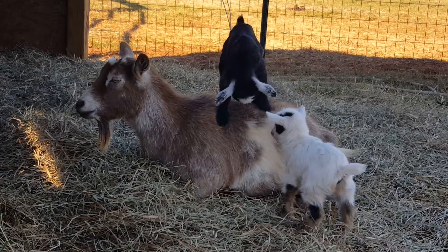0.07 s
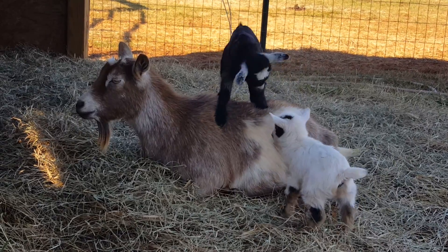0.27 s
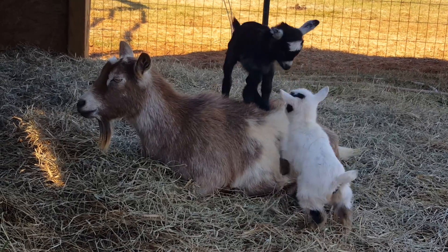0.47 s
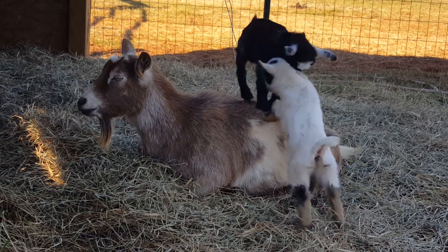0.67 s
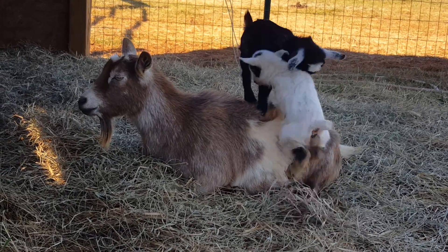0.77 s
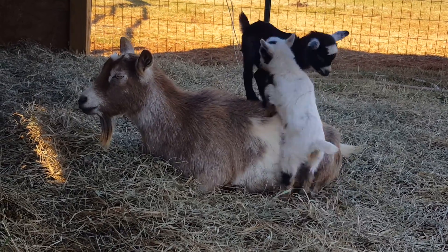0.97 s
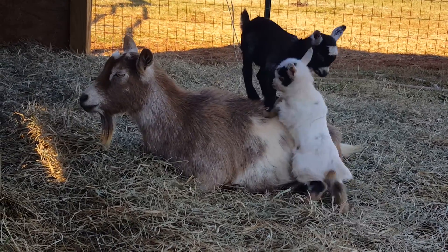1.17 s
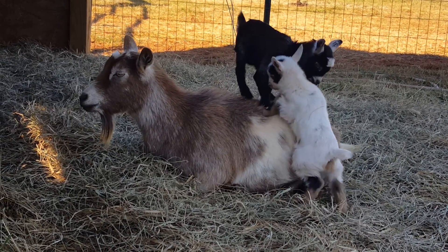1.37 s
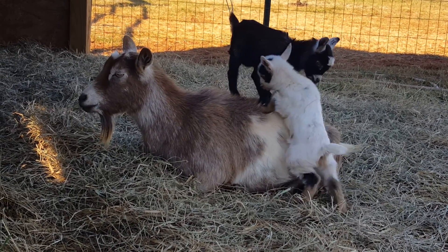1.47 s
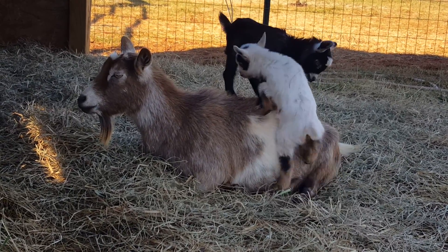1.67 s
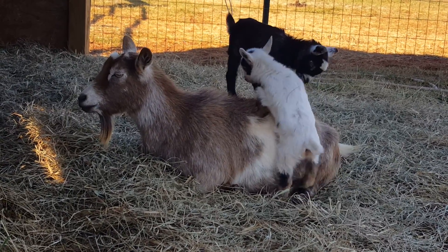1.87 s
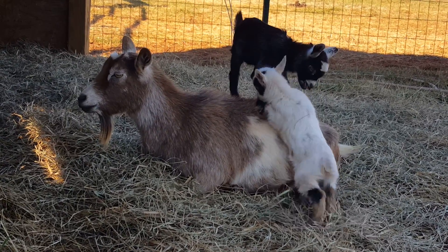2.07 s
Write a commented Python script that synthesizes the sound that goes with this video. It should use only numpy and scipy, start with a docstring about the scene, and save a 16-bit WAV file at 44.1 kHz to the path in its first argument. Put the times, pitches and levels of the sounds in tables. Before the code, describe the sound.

Wind rumble and thumping on a microphone, almost covering goat kids' light steps in dry hay

```python
"""Breeze on a camera, goats in hay

A gusty breeze buffets the two ports of a hand-held camera, the left one hardest: band-split noise whose level
and brightness follow separate tables, with soft thumps (left port) and sharp snaps. A few hard broadband ticks
sound at the left port. Far under it young goats step in dry hay: faint treble rustles and breaking stalks from
enveloped noise. Microphone hiss lies under everything; a limiter holds the loudest gusts."""
import sys
import numpy as np
from scipy.fft import rfft, irfft, next_fast_len
from scipy.io import wavfile
from scipy.ndimage import uniform_filter1d, minimum_filter1d, map_coordinates

SR = 44100
rng = np.random.default_rng(int(sys.argv[2]) if len(sys.argv) > 2 else 0)


def dump_mix(stems):
    """Bounce the given channels to the path in sys.argv[1] as a 16-bit WAV at rate SR."""
    frames = np.atleast_2d(stems).T  # one column per channel
    limited = np.clip(frames, -1, 1)  # hard clip at full scale
    pcm = np.round(limited * 32767).astype(np.int16)
    wavfile.write(sys.argv[1], SR, pcm)


N = 93183

# Microphone hiss colour: (frequency [Hz], relative level [dB])
HISS_COLOUR = [(300, -22), (1500, 10.5), (4000, 3.5), (9000, -4), (15500, -4)]
HISS_DB, TOP_HZ = -75.5, 15750

# Hooves in the hay: (time [s], level [dB], rise [s per 20 dB], hold [s], fall [s per 20 dB])
HOOF_STEPS = [(0.013, -60, 0.039, 0.0022, .06), (0.071, -75, 0.045, 0.048, 0.11),
              (0.194, -83, 0.072, 0.0066, .1), (0.432, -72, 0.052, 0.033, 0.051),
              (0.73, -66.5, 0.039, 0.11, 0.059), (0.927, -62.5, 0.053, 0.025, 0.046),
              (1.133, -56, 0.047, 0.0023, .05), (1.175, -83, 0.051, 0.0035, 0.17),
              (1.614, -60.5, 0.062, 0.027, .08), (1.745, -64, 0.045, .03, 0.044),
              (1.826, -64, .04, .005, .08), (2.015, -52.5, 0.016, .01, 0.035),
              (2.097, -50, 0.036, .02, .05)]
# Single stalks that break: (time [s], level [dB])
STALK_BREAKS = [(0.0128, -48), (.4241, -65.5), (0.5914, -68), (0.607, -56), (0.7978, -60), (0.9048, -69),
                (0.9597, -58), (0.9688, -60.5), (1.0397, -59), (1.1446, -48), (1.6196, -54.5),
                (1.7588, -59), (1.905, -57.5), (1.9857, -60)]
# Hay colour: (frequency [Hz], gain [dB])
HAY_COLOUR = [(1200, -42.5), (2200, -7.5), (3800, 3), (6500, 1.5), (11000, -2.5), (15500, -2.5)]
# Hay at the two ports: (frequency [Hz], likeness [correlation], left lag [rad])
HAY_STEREO = [(3000, .65, .4), (4500, .58, .7), (6500, .5, 1.4), (9500, .25, .6), (13500, .4, 2.6)]
STALK_T60_S = 0.014
STALKS_PER_S, STALK_SPREAD_DB, STALK_SHARE = 5600, 2.5, 0.49

# Hard ticks, left port: (time [s], level [dB])
LEFT_TICK_EVENTS = [(0.475, -28.5), (0.6217, -35.5), (0.632, -35), (1.5082, -58.5), (0.162, -48.5),
                    (0.3176, -47.5)]
# Tick colour: (frequency [Hz], gain [dB])
TICK_COLOUR = [(1500, -32), (3500, 21.5), (6000, 5), (10000, -7), (15500, -6)]

# Small eddies that snap on a port: (time [s], level before SNAP_GAIN_DB [dB], brightness [dB])
LEFT_SNAP_EVENTS = [(0.1312, -14, -35.5), (0.144, -14.5, -18.5), (0.1497, -19, -28), (0.1624, -10, -22),
                    (0.1723, -26.5, -39), (0.2247, -32, -26), (0.3165, -26.5, -11), (0.3234, -20.5, -19.5),
                    (0.3354, -21.5, -41), (0.3937, -17, -59.5), (0.438, -23, -62), (0.4713, -4.5, -34.5),
                    (0.4757, -4.5, -37.5), (0.484, -15, -21.5), (0.4911, -16.5, -22.5),
                    (0.5766, -21, -50.5), (0.6207, -5.5, -33), (0.6319, -4, -6.5), (0.6461, -11.5, -22),
                    (0.6513, -28, -27.5), (0.7587, -23.5, -65.5), (0.8643, -15.5, -42.5),
                    (0.8722, -30.5, -34), (0.9963, -19.5, -43.5), (1.0268, -12, -20.5),
                    (1.0382, -11, -40.5), (1.3029, -26.5, -47.5), (1.4163, -13.5, -34.5),
                    (1.4207, -11, -41), (1.4429, -10, -48), (1.4812, -29, -48), (1.5092, -22.5, -37.5),
                    (1.5216, -16, -36.5), (1.5505, -12, -47.5), (1.5608, -17, -41), (1.5754, -15.5, -60.5),
                    (1.6791, -3, -57.5), (1.6932, -11.5, -48.5), (1.6999, -23.5, -28.5), (1.71, -18, -28.5),
                    (1.7329, -28.5, -40.5), (1.8971, -27, -35), (1.9229, -13.5, -38), (1.9357, -12, -37),
                    (1.9534, -26.5, -29), (2.038, -15, -37.5), (2.0425, -26, -25), (2.0485, -15.5, -47),
                    (2.073, -24.5, -35.5)]
RIGHT_SNAP_EVENTS = [(0.0768, -32.5, -47), (0.118, -22.5, -32), (0.1266, -34, -35.0),
                     (0.1922, -13.5, -26.5), (0.2043, -26.5, -20.5), (0.2093, -22, -27),
                     (0.2201, -34, -25.5), (0.3184, -25.5, -48), (0.3546, -28.5, -40.5),
                     (0.5095, -34, -31.5), (0.5442, -35.5, -44), (0.6338, -26, -33.5),
                     (0.6659, -32.5, -38.5), (0.6919, -31.5, -20.5), (0.7939, -33, -38),
                     (0.8868, -25.5, -27), (0.9088, -28, -38.5), (1.0127, -23, -45), (1.0213, -32, -28),
                     (1.0685, -23.5, -29), (1.0852, -28.5, -27.5), (1.0918, -22, -19.5),
                     (1.3284, -30, -49.5), (1.5118, -17.5, -37), (1.7088, -10.5, -31), (1.7202, -20.5, -37),
                     (2.087, -34.5, -19.5)]
# Snap bands: (frequency [Hz], gain [dB], share of the brightness [ratio])
SNAP_BANDS = [(90, -12.5, 0), (228, 11, 0), (560, 7.5, 0.042), (860, 3.5, 0.0021), (1690, 2.5, 0.36),
              (2455, -0.5, 0.71), (3500, -14.5, 0.91), (5100, -25.5, 1.1), (8000, -44.5, 1.5)]
SNAP_GAIN_DB = 27.5
TWIN_MAX_SHIFT_S, TWIN_DB = 0.001, -7

# Large eddies that thump the left port: (time [s], peak of envelope [dB])
LEFT_THUMP_EVENTS = [(0.125, -5.5), (.138, -4.5), (.169, 0), (.204, -10.5), (0.3094, -12), (0.396, -7),
                     (0.4252, -15), (0.4877, 2), (0.5023, -3.5), (0.6217, 0.5), (0.655, -9.5),
                     (0.7091, -12), (0.8743, -6), (0.9947, -10.5), (1.0671, -4.5), (1.0937, -5.5),
                     (1.3998, -10), (1.4225, -5), (1.4892, -4), (1.5058, -2.5), (1.5745, -6.5), (1.686, -8),
                     (1.7173, -9), (1.9496, -7.5), (2.055, -2)]
THUMP_HZ, THUMP_LOG_SPREAD, THUMP_SIGMA_S = 241, 0.23, 0.002

# Air over each port: (time [s], rumble level [dB], brightness [dB])
LEFT_AIR_FLOW = [(0.0, -29, -29), (0.022, -21.5, -56), (0.048, -44, -48), (0.062, -40, -69),
                 (0.11, -19.5, -49), (0.13, -17, -13.5), (0.166, -7, -10), (0.19, -12.5, -53.5),
                 (0.21, -14, -55), (0.243, -28, -39), (0.261, -17.5, -27.5), (0.289, -22, -27),
                 (0.313, -14, -18), (0.347, -26, -16.5), (0.375, -39.5, -12.5), (0.397, -13, -29.5),
                 (0.417, -20.5, -51), (0.453, -33, -30.5), (0.487, -14, -3), (0.519, -21, -52),
                 (0.581, -20.5, -18), (0.599, -33, -53.5), (0.613, -13, -29.5), (0.631, -10, -6),
                 (0.653, -16, -17), (0.664, -17.5, -55), (0.714, -16.5, -24), (0.742, -27, -35),
                 (0.764, -29.5, -18), (0.796, -34.5, -64), (0.818, -41, -25.5), (0.836, -55, -29),
                 (0.844, -32, -35), (0.868, -6.5, -28), (0.91, -28, -38), (0.924, -19.5, -33.5),
                 (0.976, -33, -30), (0.994, -17, -17.5), (1.045, -16, -16.5), (1.086, -12.5, -51),
                 (1.101, -15.5, -59), (1.115, -33, -18), (1.151, -33.5, -33), (1.209, -33.5, -44),
                 (1.229, -36, -40.5), (1.241, -50, -43), (1.271, -34.5, -30), (1.291, -15.5, -24),
                 (1.339, -34.5, -34.5), (1.419, -12.5, -16), (1.469, -13, -35), (1.515, -14, -17.5),
                 (1.54, -26.5, -11), (1.565, -13, -18), (1.592, -28.5, -52), (1.622, -22, -36.5),
                 (1.686, -16.5, -18.5), (1.706, -16.5, -20), (1.744, -15.5, -64), (1.784, -44.5, -55),
                 (1.816, -19, -48), (1.874, -32.5, -25), (1.892, -18, -17.5), (1.934, -26, -8.5),
                 (1.944, -13, -21.5), (1.983, -20, -42), (2.045, -3, -19), (2.111, -20.5, -45.5)]
RIGHT_AIR_FLOW = [(0.0, -16, -29), (0.044, -38.5, -19.5), (0.124, -25, -20.5), (0.18, -24, -16),
                  (0.2, -27.5, -7.5), (0.297, -19.5, -48), (0.317, -21.5, -8), (0.377, -28, -26),
                  (0.409, -26, -43), (0.425, -15, -27), (0.451, -47.5, -49), (0.481, -30, -35),
                  (0.511, -22.5, -19), (0.589, -25.5, -50.5), (0.619, -50, -43), (0.633, -31.5, -30),
                  (0.666, -22.5, -15), (0.756, -36, -26), (0.794, -34, -17), (0.846, -43, -56),
                  (0.862, -37, -45), (0.89, -24.5, -17), (0.936, -27.5, -14.5), (0.966, -36, -48),
                  (1.016, -24.5, -33), (1.038, -24.5, -26), (1.09, -25.5, -8.5), (1.151, -40, -37),
                  (1.189, -24, -29), (1.225, -45, -42), (1.257, -30, -63), (1.283, -41.3, -37),
                  (1.293, -35, -56.5), (1.335, -18.5, -24), (1.367, -34.5, -45.5), (1.389, -25.5, -53),
                  (1.429, -28, -52), (1.451, -17.5, -33), (1.483, -43.5, -41), (1.513, -14, -15),
                  (1.54, -32, -56.5), (1.602, -29.5, -51), (1.66, -42.5, -51), (1.716, -8.5, -11.5),
                  (1.756, -30, -40), (1.792, -21, -25.5), (1.824, -34, -40), (1.876, -31, -57),
                  (1.91, -63, -16), (1.94, -28, -60), (1.958, -47, -36), (1.999, -38.5, -43),
                  (2.021, -22, -34), (2.053, -42, -37.2), (2.081, -21.5, -29), (2.111, -24, -66)]
# Turbulence bands: (frequency [Hz], gain [dB], share of the brightness [ratio], flicker depth [dB])
TURBULENCE_BANDS = [(25, -10, 0.42, -4), (51.6, -4, 0, 3), (141, 8, 0.013, 1), (254.8, 3, 0.066, 5.5),
                    (600.5, 2, 0.37, 6.5), (1022, -3.5, 0.83, 10), (2060, -14, 1.44, 7),
                    (3350, -27.5, 2.1, 3), (5530, -61, 1.5, 5.5)]
# Offset of the lowest bands on both ports: (time [s], level before its mean is removed [dB])
DEEP_LEVEL = [(0.0, -8), (0.06, 9), (0.13, -6), (0.282, -9), (0.359, -20.5), (0.43, -1), (0.551, -9),
              (0.66, 0.5), (0.83, 1.5), (0.87, -24), (0.95, 5.5), (1.07, -9), (1.15, -6), (1.3, -0.5),
              (1.48, -7), (1.56, -14.5), (1.619, -0.5), (1.72, -6.5), (1.77, -5.5), (1.9, -1), (2.06, -7),
              (2.11, -4)]
FLICKER_KNOTS_PER_S, SURGE_KNOTS_PER_S, SURGE_DB = 170, 26, -0.12
EDDIES_PER_S, EDDY_SPREAD_DB, EDDY_SHARE = 500, 4, 0.56
EVEN_S, EVENNESS = 0.029, 0.52  # span and strength of the levelling of each band

LIMIT_PEAK, LIMIT_S = 0.93, 0.0044


def amp(db):
    """dB to gain."""
    return 10 ** (np.asarray(db) / 20)


def unit(x):
    """Scale to rms 1."""
    return x / np.sqrt(np.mean(x ** 2) + 1e-20)


def filtered(x, response):
    """Apply a frequency response by FFT, zero-padded."""
    size = next_fast_len(N + 8192)
    spectrum = rfft(x, size) * response(np.fft.rfftfreq(size, 1 / SR))
    return irfft(spectrum, size)[..., :N]


def colour(points):
    """Response through (frequency [Hz], gain [dB]) points on a log axis."""
    f_hz, db = np.transpose(points)[:2]
    return lambda hz: amp(np.interp(np.log(hz + 1), np.log(f_hz), db))


def bands(points):
    """The colour cut into overlapping bands, one around each point."""
    log_f = np.log(np.transpose(points)[0])

    def response(hz):
        tents = np.array([np.interp(np.log(hz + 1), log_f, row) for row in np.eye(len(log_f))])
        return colour(points)(hz) * np.sin(np.pi / 2 * tents) ** 2
    return response


def wobble(knots_per_s):
    """Smooth random curve: a spline through normal knots."""
    knots = rng.standard_normal(N // 50)
    return map_coordinates(knots, [np.arange(N) * knots_per_s / SR])


def hiss():
    """Microphone self-noise: coloured noise, independent in each channel."""
    return amp(HISS_DB) * unit(filtered(rng.standard_normal((2, N)), colour(HISS_COLOUR)))


def hay():
    """Each step crushes a crowd of stalks: dense ticks on a noise bed, later at the left port."""
    t = np.arange(N) / SR
    step, breaks = np.zeros(N), np.zeros(N)
    for s, db, rise_s, hold_s, fall_s in HOOF_STEPS:
        slope = np.where(t < s, (s - t) / rise_s, np.maximum(t - s - hold_s, 0) / fall_s)
        step += amp(db - 20 * slope)
    for s, db in STALK_BREAKS:
        breaks += (t >= s) * amp(db - 60 * np.abs(t - s) / STALK_T60_S)
    crackle = amp(STALK_SPREAD_DB * rng.exponential(size=N))
    crackle = crackle * (rng.random(N) < STALKS_PER_S / SR)
    texture = 1 - STALK_SHARE + STALK_SHARE * unit(uniform_filter1d(crackle, size=12))
    noise = rng.standard_normal((2, N))
    noise = noise * (texture * step * amp(1.8 * wobble(63)) + breaks)

    f_hz, likeness, lag_rad = np.transpose(HAY_STEREO)

    def mid_side(hz):
        # correlation of mid + side with mid - side is cos(2 * turn)
        turn = np.arccos(np.clip(np.interp(hz, f_hz, likeness), -1, 1)) / 2
        return colour(HAY_COLOUR)(hz) * [np.cos(turn), np.sin(turn)]

    def left_lag(hz):
        return np.exp(-0.5j * np.interp(hz, f_hz, lag_rad) * np.array([[1], [-1]]))

    mid, side = filtered(noise, mid_side)
    return filtered(np.array([mid + side, mid - side]), left_lag)


def ticks():
    """Broadband ticks: one-sample pulses through the tick colour."""
    s, level_db = np.transpose(LEFT_TICK_EVENTS)
    pulses = np.zeros(N)
    pulses[(s * SR).astype(int)] = amp(level_db) * 2
    return filtered(pulses, colour(TICK_COLOUR))


def snaps(events):
    """Pressure jumps of either sign, each with a weaker twin; brightness lifts the upper bands most."""
    s, level_db, bright_db = np.transpose(events)
    share = np.transpose(SNAP_BANDS)[2][:, None]
    sign, twin_sign, shift = rng.uniform(-1, 1, (len(s), 3)).T
    gain = amp(level_db + SNAP_GAIN_DB + share * bright_db)
    twin_s = s + TWIN_MAX_SHIFT_S * shift
    pulses = np.zeros((len(SNAP_BANDS), N))
    pulses[:, (s * SR).astype(int)] = np.sign(sign) * gain
    pulses[:, (twin_s * SR).astype(int)] += np.sign(twin_sign) * gain * amp(TWIN_DB)
    # 1j: quarter-turn of phase, so each pulse swings both ways
    return filtered(pulses, lambda hz: 1j * bands(SNAP_BANDS)(hz)).sum(axis=0)


def thumps():
    """Soft swings of pressure: Gaussian-windowed cosines of random pitch and phase."""
    out, t = np.zeros(N), np.arange(-600, 600) / SR
    window = np.exp(-0.5 * (t / THUMP_SIGMA_S) ** 2)
    draws = rng.uniform(-0.81, 1, (len(LEFT_THUMP_EVENTS), 2))
    for (s, peak_db), (pitch, turn) in zip(LEFT_THUMP_EVENTS, draws):
        hz = THUMP_HZ * np.exp(THUMP_LOG_SPREAD * pitch)
        swing = np.cos(2 * np.pi * hz * t + np.pi * turn)
        start = round(s * SR) - len(t) // 2
        out[start:][:len(t)] += amp(peak_db) * window * swing
    return out


def turbulence():
    """Steady noise with chance eddies, split into bands; each band's slow power swings are reduced."""
    sign = np.sign(rng.standard_normal(N))
    eddies = sign * amp(EDDY_SPREAD_DB * rng.exponential(size=N))
    eddies = eddies * (rng.random(N) < EDDIES_PER_S / SR)
    stream = unit((1 - EDDY_SHARE) * rng.standard_normal(N) + EDDY_SHARE * unit(eddies))
    # at 0 dB colour, 600 Hz of bandwidth has rms 1
    parts = filtered(stream, bands(TURBULENCE_BANDS)) / np.sqrt(600 / (SR / 2))
    span = int(EVEN_S * SR)
    power = np.abs(uniform_filter1d(uniform_filter1d(parts ** 2, span), span)) + 1e-20
    return parts * (power.mean(axis=1, keepdims=True) / power) ** (EVENNESS / 2)


def buffet(air):
    """Turbulent air on a port: level drives all bands, brightness and flicker each by its band's share."""
    t = np.arange(N) / SR
    s, level_db, bright_db = np.transpose(air)
    level_curve_db = uniform_filter1d(np.interp(t, s, level_db), size=200)
    bright_curve_db = uniform_filter1d(np.interp(t, s, bright_db), size=200)
    share, flicker_db = np.transpose(TURBULENCE_BANDS)[2:, :, None]
    parts = turbulence()
    flicker = 1.5 * np.tanh(wobble(FLICKER_KNOTS_PER_S) / 1.5)  # bounded to +-1.5
    gain_db = level_curve_db + SURGE_DB * wobble(SURGE_KNOTS_PER_S)
    gain_db = gain_db + share * bright_curve_db + flicker_db * flicker
    deep_s, deep_db = np.transpose(DEEP_LEVEL)
    deep_curve_db = np.interp(t, deep_s, deep_db - deep_db.mean())
    gain_db[:2] += deep_curve_db
    gain_db[2] += 0.58 * deep_curve_db
    return (parts * amp(gain_db)).sum(axis=0)


def scene():
    """Wind on each port (left, right) over the hay."""
    left = buffet(LEFT_AIR_FLOW) + thumps() + snaps(LEFT_SNAP_EVENTS) + ticks()
    right = buffet(RIGHT_AIR_FLOW) + snaps(RIGHT_SNAP_EVENTS)
    return np.array([left, right]) + hay()


def record(dry):
    """Look-ahead peak limiter per channel, then hiss, then band limit."""
    span = int(LIMIT_S * SR)
    need = np.minimum(1, LIMIT_PEAK / (np.abs(dry) + 1e-9))
    held = minimum_filter1d(need, 2 * span)
    gain = uniform_filter1d(uniform_filter1d(held, span), span)
    return filtered(dry * gain + hiss(), lambda hz: hz < TOP_HZ)


dry = scene()
out = record(dry)
dump_mix(out)
```